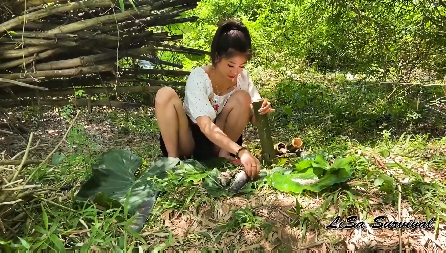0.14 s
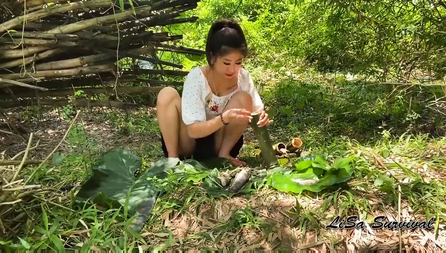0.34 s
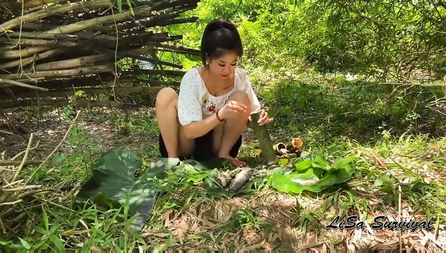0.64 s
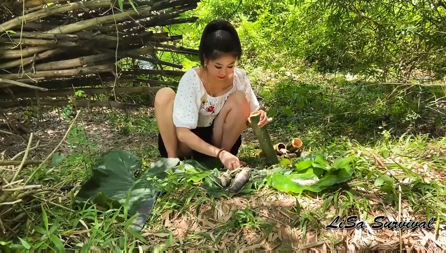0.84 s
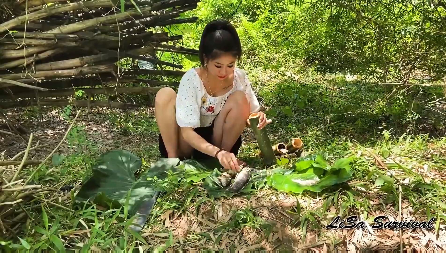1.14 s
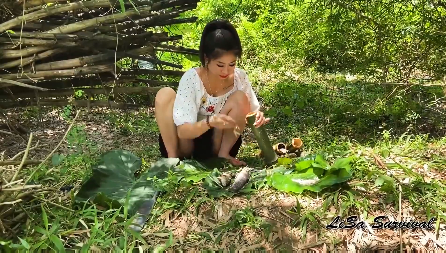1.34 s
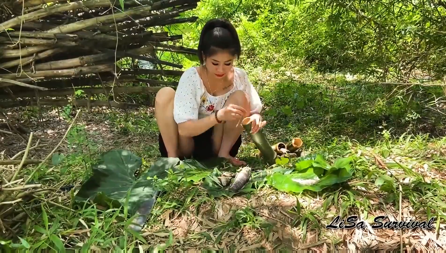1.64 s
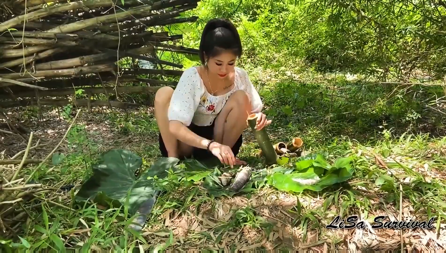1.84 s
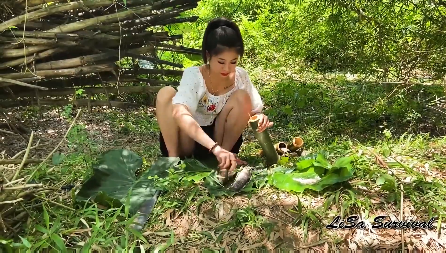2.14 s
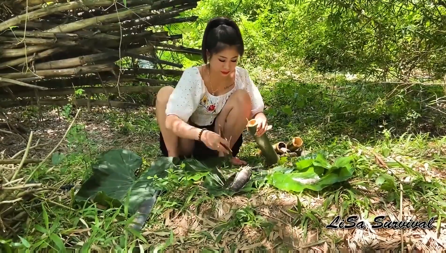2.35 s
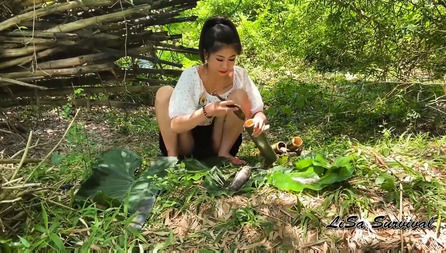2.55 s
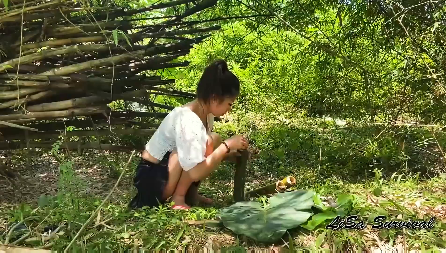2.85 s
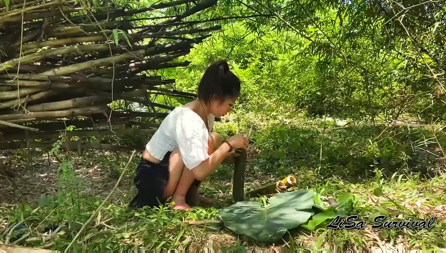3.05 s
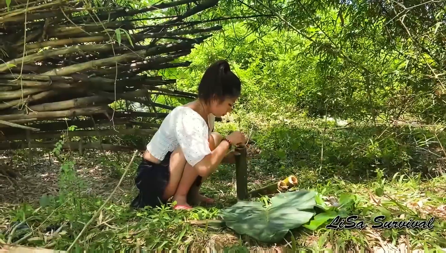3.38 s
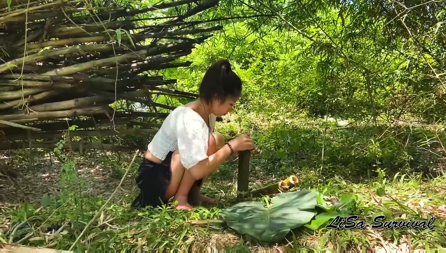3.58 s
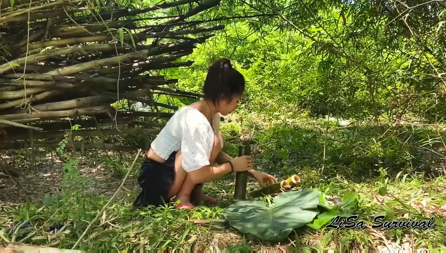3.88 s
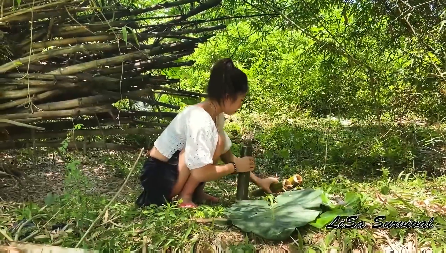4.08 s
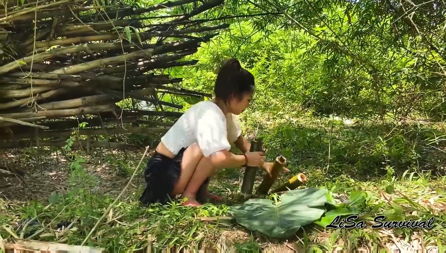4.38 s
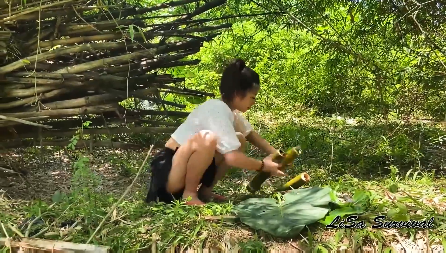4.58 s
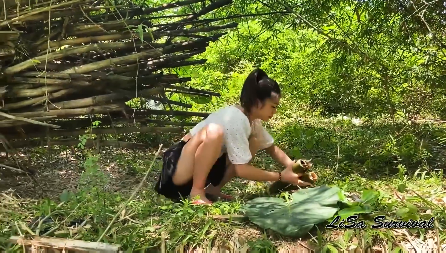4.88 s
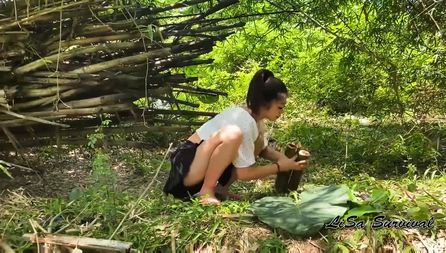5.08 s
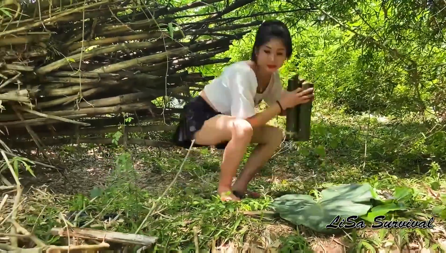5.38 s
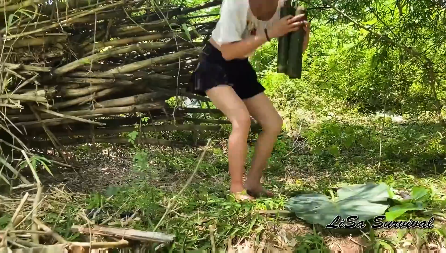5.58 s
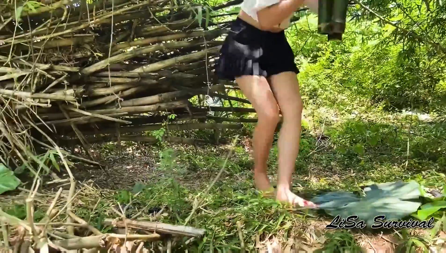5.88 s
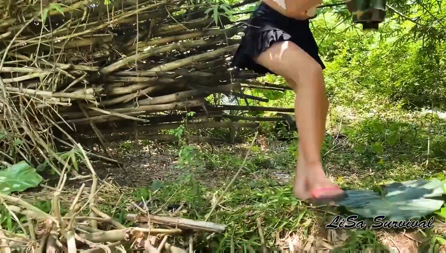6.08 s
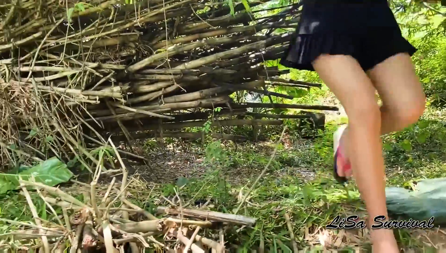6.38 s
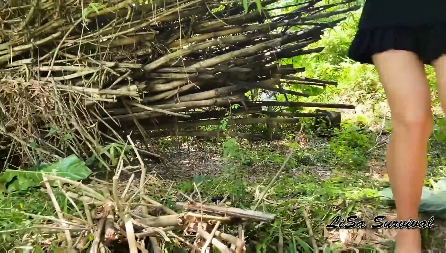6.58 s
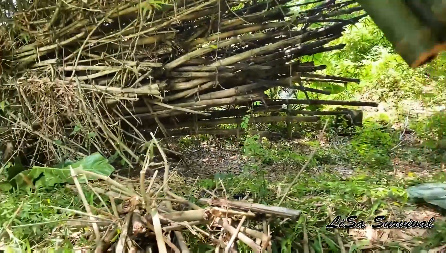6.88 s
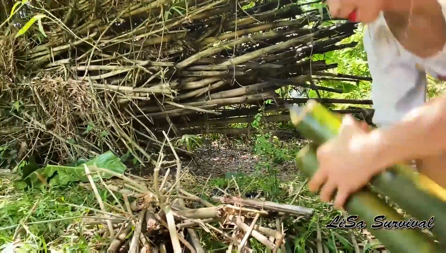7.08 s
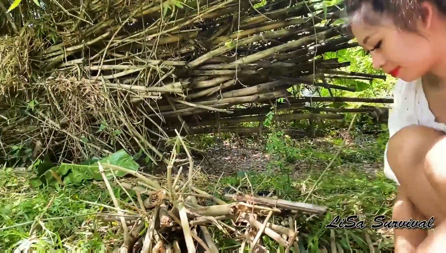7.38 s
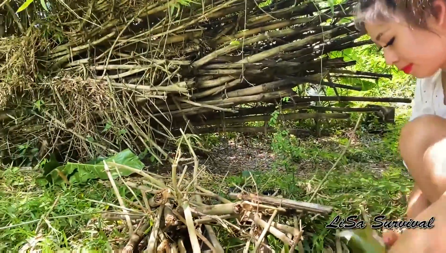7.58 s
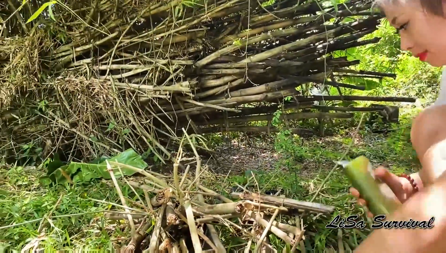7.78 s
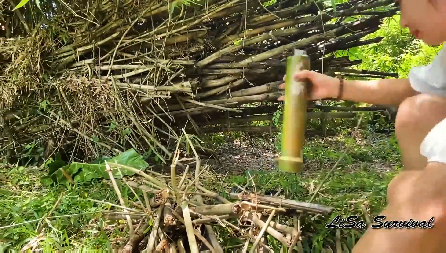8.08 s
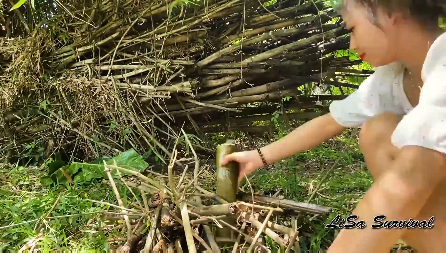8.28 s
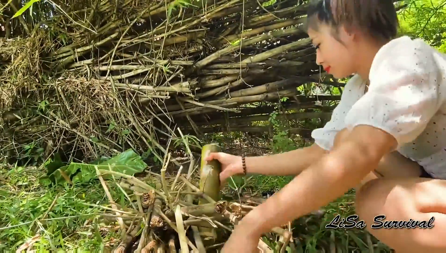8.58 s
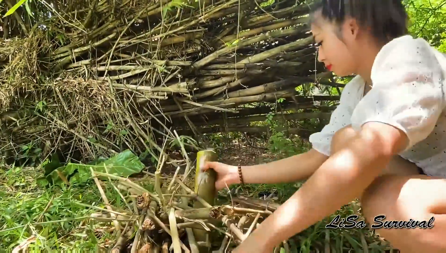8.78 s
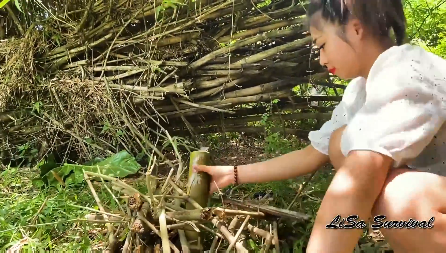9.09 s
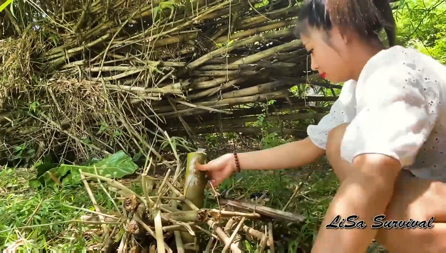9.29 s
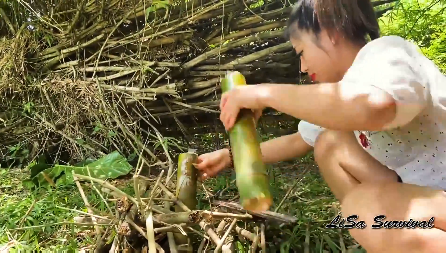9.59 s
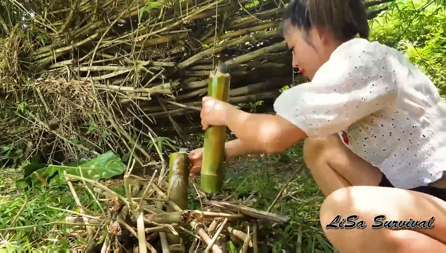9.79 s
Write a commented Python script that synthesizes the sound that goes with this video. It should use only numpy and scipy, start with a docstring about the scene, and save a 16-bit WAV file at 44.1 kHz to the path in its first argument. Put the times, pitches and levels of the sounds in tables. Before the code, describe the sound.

Outdoors, faint dry-leaf crackles over a far motor's hum; after a soft pop, birds chirp, hollow bamboo clacks and brittle sticks snap close by.

```python
"""Low air rumble and a far engine drone come first, with dry leaves rustling and twigs snapping close by.
Bamboo tubes then knock among sticks in a grove: decaying modes plus a noise crack for each blow.
Leaves are spiky noise and ringing splinters, snaps are noise bursts with a ping, bumps are damped sines.
Insects and air are shaped noise, the engine is wavering sines, two birds are gliding husky whistles.
The level dips almost to silence near 2.85 s and returns after a soft pop, with the air quieter."""
import sys
import numpy as np
from scipy import signal
from scipy.fft import rfft, irfft, next_fast_len
from scipy.io import wavfile
from scipy.ndimage import uniform_filter1d

SR = 44100
rng = np.random.default_rng(int(sys.argv[2]) if len(sys.argv) > 2 else 0)


def unload_audio(sound):
    """Save the sound as a 16-bit wav file, at the path given as the first command line argument."""
    columns = np.transpose(np.atleast_2d(sound))
    # keep every value between -1 and 1, then stretch to whole-number steps
    steps = np.round(np.clip(columns, -1, 1) * 32767)
    wavfile.write(sys.argv[1], SR, steps.astype(np.int16))


N = 438354
GAP_S = 2.87  # engine levels and stereo balance switch here


def amp(db):
    """Gain of a level in dB."""
    return np.exp(np.asarray(db) * np.log(10) / 20)


def unit(x):
    """x at rms 1."""
    return x / np.sqrt(np.mean(x ** 2) + 1e-20)


def along(points, hz):
    """Interpolate (Hz, value) points on a log frequency axis."""
    point_hz, value = np.transpose(points)
    return np.interp(np.log(hz + 1), np.log(point_hz + 1), value)


def curves(rows):
    """One value per sample for each column after the time."""
    s, *columns = np.transpose(rows)
    return [np.interp(np.arange(N) / SR, s, column) for column in columns]


def wobble(knots_per_s):
    """Random curve, linear between normal knots."""
    knots = rng.standard_normal(int(N * knots_per_s / SR) + 2)
    return np.interp(np.arange(N) * knots_per_s / SR, np.arange(len(knots)), knots)


def filtered(x, response):
    """x times a response of frequency, zero-padded."""
    size = next_fast_len(N + SR // 2)
    spectrum = rfft(x, size) * response(np.fft.rfftfreq(size, 1 / SR))
    return irfft(spectrum, size)[..., :N]


# Far sounds. Each row: frequency in Hz, left-right correlation [0..1].
FAR_LIKENESS = [(60, .82), (130, .72), (290, .72), (640, .72), (1410, .4), (2400, .6), (3800, .35),
                (6820, .3), (15000, .4)]


def rush(spectrum, grain=1, alike=FAR_LIKENESS):
    """Stereo noise of rms 1; mid and side shares set the correlation, a varying grain makes it spiky."""
    def mid_side_response(hz):
        turn_rad = np.arccos(np.clip(along(alike, hz), -1, 1)) / 2
        return amp(along(spectrum, hz)) * [np.cos(turn_rad), np.sin(turn_rad)]

    mid, side = filtered(grain * rng.standard_normal((2, N)), mid_side_response)
    return unit(np.array([mid + side, mid - side]))


def patchy(x, depth_db):
    """Random patches of gain over time and frequency keep the colour changing; rms 1."""
    bins = signal.stft(x, nperseg=256)[2]
    field = uniform_filter1d(rng.standard_normal(bins.shape[1:]), size=7, axis=0)
    field = uniform_filter1d(field, size=9, axis=1)
    return unit(signal.istft(bins * amp(depth_db * unit(field)), nperseg=256)[1][:, :N])


def add(track, s, sound, pan_db):
    """Lay a sound into a stereo track; positive pan favours the left."""
    start = round(s * SR)
    track[:, start:start + sound.shape[-1]] += amp([[pan_db / 2], [-pan_db / 2]]) * sound


def glides(rows, rough):
    """Short husky gliding tones with soft ends."""
    track = np.zeros((2, N + SR))
    for s, first_hz, last_hz, length_s, db in rows:
        u = np.linspace(0, 1, round(length_s * SR))
        flutter = unit(uniform_filter1d(rng.standard_normal(SR // 10), size=90))
        husk = 1 + rough * flutter[:len(u)]
        pitch_hz = last_hz + (first_hz - last_hz) * (1 - u) ** 2
        tone = np.sin(2 * np.pi * np.cumsum(pitch_hz) / SR)
        envelope = np.sqrt(np.abs(np.sin(np.pi * u)))
        add(track, s, amp(db) * husk * envelope * tone, 1.5)
    return track[:, :N]


def from_left(x):
    """A far source off to the left: the right port hears it later."""
    lead_samples = 11
    return np.array([x[0], np.roll(x[1], lead_samples)])


# Modes of three tubes. Each row: nominal frequency in Hz, level in dB, free t60 in s.
THIN = [(373, 3.5, 0.026), (840, 3.5, 0.019), (1247, 10, 0.0074), (1450, 0.5, 0.017), (1717, -0.5, 0.028),
        (2150, -1.5, 0.014), (2810, 2.5, 0.017), (3850, 0.5, 0.013), (4100, 1.5, 0.014),
        (4700, -0.5, 0.0087), (4900, -2, 0.009), (6120, -2, .009), (6750, 6, 0.0077), (7440, -6, 0.0063)]
GREEN = [(268, 4.5, 0.032), (550, 9.5, 0.018), (926, 5.5, 0.009), (1120, 1.5, 0.0091), (1990, 1.5, .014),
         (2150, -3, 0.017), (2640, 1.5, 0.018), (3570, 1, 0.0081), (4630, 0, .012), (6000, -9, 0.01),
         (7500, -6, 0.0072)]
WIDE = [(330, 7, 0.021), (454, 3, 0.026), (640, -11, 0.015), (1130, -3.5, 0.027), (1350, 1, 0.015),
        (1740, -1, 0.016), (2480, 4, 0.014), (3200, 1.5, 0.017), (4050, -3, 0.0079), (4890, 7.5, 0.013),
        (5920, -7, 0.008), (6950, -20, 0.0075), (7540, 3, 0.0088)]
# Tube being hit. Each row: from time in s, mode table.
STRUCK = [(0, THIN), (5.5, GREEN), (7.9, WIDE), (8.1, THIN)]
# Tube contacts. Each row: start in s, level in dB, centre of the blow in Hz, hollow thud in dB, wall in dB, #
# wall centre in Hz, edge in dB, left-right in dB, factor the grip applies to the free t60.
TUBE_KNOCKS = [(4.115, -68, 2020, 13, 13, 845, -5, 1, .9), (4.819, -31.5, 1590, -4, 6, 1380, -3.5, 0, 0.82),
               (4.8275, -25.5, 3220, -9.5, 2, 1360, -5.5, -2, 0.85),
               (4.8632, -46, 1560, -7, 0, 794, 1, 3, 0.77), (4.9275, -61, 1670, 0, -13, 727, 3, 0.0, .7),
               (4.9626, -54, 3240, -11, -19, 786, -2, 4, 0.94),
               (5.0272, -36, 1670, -11, -5, 1350, -2, 0, 0.82),
               (5.0387, -40, 2300, -2, -3, 875, -16, -0.5, .6),
               (5.046, -50, 2300, -9, -6, 1300, -9, 0, 0.65), (5.059, -51, 1900, -9, -6, 1300, -15, 0, .6),
               (5.069, -32.5, 1870, -14, -4, 1320, -13, 1, 1.16),
               (5.0752, -45, 2700, -22, -5, 1310, 1, -1, .6), (5.5585, -62, 1520, 1, 19, 1260, -3, 2, .9),
               (5.7232, -49, 1670, -1, 5, 856, -10, 1, 0.83), (6.634, -67, 2260, 6, 21, 900, -9, -3, 1.2),
               (7.018, -46, 2650, -15, -12, 1170, -15, 3, 1.2),
               (7.086, -38, 2300, -6, 12, 940, -20, -3, 0.87),
               (7.129, -42, 2500, -17, -3, 1190, -6, -5, 0.65),
               (7.132, -42, 3300, -20, -6, 1190, -3, -7, 0.68),
               (7.137, -38, 2300, -15, 9, 1190, -3, -11, 0.69),
               (7.4012, -23, 2630, -15.5, 4.5, 1070, -9, -3.5, 0.64),
               (7.6733, -60, 2700, 10, 15, 921, -1, 3, 0.89),
               (7.9824, -18.5, 2560, -11, 3.5, 1330, -6, -1, 0.86),
               (7.989, -32.5, 2560, 5.5, 6.5, 1100, -4, -0.5, 0.97),
               (8.1618, -39, 2150, -9, -10, 832, -19, -6, .9),
               (8.427, -39.5, 3650, -11, -23, 896, -26, -1, 1.4),
               (8.4564, -30.5, 3800, -26, -1.5, 1160, -7, 1, 0.68),
               (8.4935, -27.5, 1770, -38, -23, 1170, -2, 3, 1),
               (8.4993, -32, 1740, -21, -4, 1370, -11, -4, 1.05),
               (8.5164, -32.5, 3900, -25, -23, 1440, 2.5, 0, 0.86),
               (8.529, -44, 2700, -25, -8, 1300, 8, 1.0, 0.77),
               (8.717, -41, 2330, -19, 2, 1150, -4, 1.5, 0.85),
               (9.046, -48, 2390, -16, 1, 1210, -12, 2.0, .9),
               (9.6507, -66, 3740, 7, 12.5, 877, 8, 12, 1.04), (9.7934, -61, 1730, 6, -14, 716, -15, 1, .9)]


def tubes():
    """A blow rings middle modes nearest its centre most; hollow, wall and edge modes have own strengths."""
    track, t = np.zeros((2, N + SR)), np.arange(SR // 12) / SR
    rise = 1 - np.exp(-(t / 0.0013) ** 2)  # the contact lasts a moment
    port_db, port_rad = 1.1, .18  # spread of each mode between the two ports
    ports = np.reshape([1, -1], (2, 1, 1))
    for s, db, centre_hz, thud_db, wall_db, wall_hz, edge_db, pan_db, grip in TUBE_KNOCKS:
        modes = [table for since_s, table in STRUCK if since_s <= s][-1]
        hz, mode_db, t60_s = np.transpose(modes)[:, :, None]
        middle_db = -10.5 * np.abs(np.log2(hz / centre_hz))
        near_wall_db = wall_db - 14 * np.abs(np.log2(hz / wall_hz))
        share_db = np.select([hz < 600, hz < 1500, hz > 4450], [thud_db, near_wall_db, edge_db], middle_db)
        luck, phase, size, lean, turn = rng.standard_normal((5, *hz.shape))
        level_db = share_db + mode_db + 1.5 * luck + port_db * lean * ports
        angle = 2 * np.pi * hz * (1 + .015 * size) * t + 0.5 * phase + port_rad * turn * ports
        ring = amp(level_db - 60 * t / (grip * t60_s)) * np.sin(angle)
        noise = np.convolve(rng.standard_normal(len(t)), np.hanning(M=7) / 2, "same")
        crack = amp(edge_db - 0.5 - 60 * t / (grip * 0.031)) * noise
        add(track, s, amp(db) * rise * (ring.sum(axis=1) + crack), pan_db)
    return track[:, :N]


# Faint squeaks while the tubes are handled. Each row: start in s, first Hz, last Hz, length in s, level in dB.
HANDLING_SQUEAKS = [(6.733, 3450, 3400, .065, -56), (7.69, 1080, 1270, .09, -66),
                    (7.758, 5200, 4870, .008, -51), (7.75, 1850, 1820, .036, -68),
                    (7.75, 2500, 2450, .04, -70), (7.893, 3800, 3870, .065, -67),
                    (7.9, 3350, 3400, .06, -72), (7.905, 1450, 1430, .048, -67),
                    (8.028, 3900, 4220, .05, -56), (8.66, 5900, 5200, .015, -59)]


def squeaks():
    """Slightly rough gliding tones."""
    return glides(HANDLING_SQUEAKS, rough=.35)


# Twig and leaf snaps. Each row: start in s, level in dB, centre in Hz, left-right in dB, t60 in s.
TWIG_SNAPS = [(.178, -52, 5000, 0, 0.0091), (.213, -52, 7000, 0, .015), (.451, -59, 4590, -11, .015),
              (.9996, -47, 8500, -11, 0.013), (1.0744, -51, 4080, 3, 0.016), (1.205, -48, 5620, 2, .015),
              (1.2615, -47, 4470, -2, .015), (1.315, -39, 3630, 1, 0.023), (1.9, -46.5, 4830, 2, 0.017),
              (1.9444, -54, 4550, 1, .015), (2.135, -44, 13000, 0, .012), (2.177, -47.5, 6000, -10, .015),
              (2.2677, -48, 5500, 11, .015), (2.354, -55, 12500, 3, .012), (2.359, -42.5, 6200, 18, 0.012),
              (2.716, -46, 5850, 4, .015), (3.179, -49, 5630, .5, .015), (3.746, -54, 12500, .5, .008),
              (3.9848, -41, 6000, .5, 0.016), (4.4994, -48, 7140, .5, .015), (5.969, -37, 4200, -2, 0.022),
              (6.3544, -32.5, 3800, 4, 0.02), (6.732, -41, 5900, 15, .015), (6.74, -51, 5900, 3, .015),
              (6.753, -35, 2600, 0, .012), (6.869, -45, 6600, 13, .01), (6.871, -50, 2190, 0, .015),
              (7.008, -28, 7100, 13, 0.011), (7.138, -36, 8000, 12, 0.015), (7.575, -37, 8100, 0, 0.017),
              (7.64, -44, 4850, 0, .012), (7.65, -37, 4940, 0, 0.015), (7.76, -33.5, 7130, 6, 0.017),
              (8.013, -40, 2500, -2, .02), (8.06, -40, 9000, 0, .009), (8.096, -41, 2770, -3, 0.016),
              (8.335, -40, 5130, 0, 0.017), (8.369, -23.5, 5000, -3, 0.013), (8.371, -26, 11000, -2, 0.01),
              (8.3886, -21.5, 9950, 8.5, 0.01), (8.4022, -24, 6650, -0.5, 0.018),
              (8.47, -32, 4500, 6, .015), (8.5135, -24, 6600, 2, .015), (8.5774, -44, 6440, 3, .015),
              (8.62, -37, 2900, 0, .015), (8.704, -38, 6600, 0, .015), (8.8104, -34, 6900, 9, 0.014),
              (8.859, -34, 11500, 2, .007), (8.894, -36, 7100, 3, .012), (8.937, -29, 6570, 6, 0.015),
              (9.102, -26.5, 5900, -6, 0.0095), (9.109, -22.5, 9000, 9.5, .006),
              (9.1313, -24.5, 8900, 0, 0.007), (9.599, -56, 4600, -2, .015)]


def snaps():
    """A short burst of noise and a ping at the size of the broken piece."""
    track, t = np.zeros((2, N + SR)), np.arange(SR // 30) / SR
    for s, db, centre_hz, pan_db, t60_s in TWIG_SNAPS:
        edges_hz = [0.72 * centre_hz, min(1.45 * centre_hz, 20000)]
        band = signal.butter(N=1, Wn=edges_hz, btype="band", fs=SR, output="sos")
        burst = unit(signal.sosfilt(band, rng.standard_normal(len(t))))
        ping = .9 * np.sin(2 * np.pi * centre_hz * t)
        envelope = amp(db - 10.5 - 60 * t / t60_s) * (1 - np.exp(-t / 0.00062))
        add(track, s, envelope * (burst + ping), pan_db)
    return track[:, :N]


# Leaves never lie quite still. Each row: time in s, crunch in dB, swish in dB.
LEAF_STIR = [(0, -81, -90), (2.87, -77.5, -70.5), (3.5, -84.5, -74), (5.8, -83, -75), (7, -79, -66),
             (9.2, -71.5, -65), (9.94, -86.5, -74)]
# Dry leaves crushed or dragged. Each row: time at full strength in s, hold in s, crunch in dB, swish in dB.
LEAF_CONTACTS = [(.21, .01, -68.5, -85), (.448, 0.014, -64.5, -69), (.84, 0.009, -78, -79),
                 (1.0, 0.089, -77, -77), (1.2, 0.088, -69, -69), (1.49, 0.012, -80, -69),
                 (1.93, 0.04, -64.5, -61), (2.13, 0.28, -72.5, -76), (2.55, .16, -85, -90),
                 (3.612, 0.028, -89, -66), (3.98, 0.029, -71.5, -64), (4.095, 0.0076, -67.5, -67),
                 (4.51, 0.055, -74, -66), (4.819, 0.12, -71, -64.5), (5.033, 0.06, -69, -79),
                 (5.207, 0.074, -64.5, -61.5), (5.42, 0.0085, -69.5, -72), (5.559, .01, -72, -82),
                 (5.75, 0.011, -69.5, -71), (5.962, 0.028, -58.5, -52.5), (6.058, 0.004, -66.5, -56),
                 (6.354, 0.017, -56.5, -49.5), (6.48, 0.011, -68, -58.5), (6.728, 0.012, -54, -51),
                 (6.752, 0.006, -52, -44), (6.84, 0.046, -65, -55.5), (7.008, 0.0071, -54, -48),
                 (7.088, 0.0085, -57, -48.5), (7.108, .015, -64, -63), (7.13, 0.0031, -54, -47),
                 (7.397, 0.004, -57, -51), (7.584, 0.014, -60, -53.5), (7.64, .12, -68, -59.5),
                 (7.968, .002, -55, -49), (8.0, 0.25, -55, -50), (8.366, 0.12, -52.5, -48.5),
                 (8.491, 0.02, -43, -52), (8.525, 0.0057, -58, -59), (8.58, .36, -61, -57.5),
                 (8.6, 0.014, -53.5, -49), (8.704, 0.063, -55.5, -65), (8.807, 0.005, -56, -56),
                 (8.925, 0.015, -53.5, -60), (9.019, 0.075, -58.5, -59.5), (9.099, 0.0032, -52.5, -51),
                 (9.285, 0.023, -64.5, -60), (9.417, 0.03, -65, -56.5), (9.668, 0.0083, -78, -73),
                 (9.798, 0.0081, -73, -77)]


def handling():
    """Gains of crunch and swish: each contact swells fast, holds and dies away over a faint stir."""
    rise_db_per_s, fall_db_per_s = 619, 329.5
    t, power = np.arange(N) / SR, amp(curves(LEAF_STIR)) ** 2
    for s, held_s, *levels_db in LEAF_CONTACTS:
        near = slice(round((s - .15) * SR), round((s + held_s + .25) * SR))
        rise_loss_db = rise_db_per_s * np.clip(s - t[near], 0, None)
        fall_loss_db = fall_db_per_s * np.clip(t[near] - s - held_s, 0, None)
        power[:, near] += amp(np.array(levels_db)[:, None] - (rise_loss_db + fall_loss_db)) ** 2
    return np.sqrt(power)


def crackle():
    """Tiny ringing splinters of scattered pitch, size and side; rms 1."""
    rate_per_s, usual_hz, life_cycles = 900, 3800, 6  # a splinter falls 26 dB per life, then fades out
    start, side = rng.random((2, int(rate_per_s * N / SR), 1))
    k = np.arange(300)
    hz = np.clip(usual_hz * np.exp(.45 * rng.standard_normal(start.shape)), 1200, 14000)
    cycles = hz * k / SR
    envelope = amp(4.5 * rng.standard_normal(start.shape) - 26 * cycles / life_cycles)
    envelope = envelope * np.tanh(cycles) * (1 - k / len(k))
    grain = envelope * np.sin(2 * np.pi * cycles)
    where = ((start * N).astype(int) + k).ravel()
    turn_rad = np.pi / 4 + .9 * (side - .5)
    gains = np.cos(turn_rad), np.sin(turn_rad)
    return unit(np.array([np.bincount(where, (g * grain).ravel(), N + len(k))[:N] for g in gains]))


# Leaf spectra. Each row: frequency in Hz, density in dB per Hz.
CRUNCH_SPECTRUM = [(500, -9), (1000, -1.5), (2000, -4), (4000, -2), (7000, -4), (12000, -21.5),
                   (16000, -24)]
SWISH_SPECTRUM = [(3000, -13), (6000, -2), (10000, -0.5), (13000, -1.5), (16000, 1)]
# Close leaves. Each row: frequency in Hz, left-right correlation [0..1].
LEAF_LIKENESS = [(550, .9), (1650, .5), (5000, .42), (15000, .5)]
# Where the leaves rustle. Each row: time in s, left-right in dB.
LEAF_PLACE = [(0, 6), (2.3, 2), (2.9, 1), (6.2, 0.5), (6.8, 3), (7.9, 1), (8.2, 2.5), (8.5, 1), (9.94, 1.5)]


def leaves():
    """Clumps of tiny breaks: noise whose gain jumps from millisecond to millisecond."""
    crunch_gain, swish_gain = handling()
    clumps_db = 1.1 * wobble(80)
    crunch = rush(CRUNCH_SPECTRUM, amp(clumps_db + 1.0 * wobble(600)), LEAF_LIKENESS)
    swish = rush(SWISH_SPECTRUM, amp(clumps_db + 2.4 * wobble(900)), LEAF_LIKENESS)
    crunch = patchy(crunch, depth_db=3.0) + amp(-4) * crackle()
    swish = patchy(swish, depth_db=1.4)
    pan = amp(curves(LEAF_PLACE)[0] * [[.5], [-.5]])
    return pan * (crunch_gain * crunch + swish_gain * swish)


# Soft low bumps. Each row: start in s, level in dB, frequency in Hz.
GROUND_THUMPS = [(0.327, -36, 165), (0.347, -33, 260), (0.635, -50, 121), (0.698, -37, 155),
                 (3.377, -63, 121), (3.629, -45, 171), (5.729, -37, 148), (5.872, -35.5, 123),
                 (7.969, -40, 308), (9.465, -39.5, 171), (9.653, -45, 190)]


def thumps():
    """Heel, hand or tube end on soft ground: a heavily damped sine."""
    track, t = np.zeros((2, N + SR)), np.arange(SR // 20) / SR
    for s, db, hz in GROUND_THUMPS:
        add(track, s, amp(db + 4.5 - 60 * t / 0.032) * np.sin(2 * np.pi * hz * t), 0)
    return track[:, :N]


# One falling chirp. Each row: time in s, nominal pitch in Hz, level in dB.
CHIRP_NOTE = [(.0042, 12320, -10.5), (.006, 10600, -6), (.008, 8310, -0.5), (0.0103, 6990, 1.5),
              (.014, 6140, 1.5), (.02, 5450, -2), (.032, 4720, -7), (.042, 4490, -13), (0.055, 4250, -17)]
# Its repeats. Each row: time origin in s, level in dB, extra on the high start in dB.
BIRD_CHIRPS = [(2.935, -55.5, 6), (3.086, -54, 2), (3.222, -53, 2), (3.357, -53, -6), (3.496, -54.5, -4),
               (3.629, -54, -7), (3.768, -54, 8), (3.902, -53, 8), (4.036, -53.5, 5), (4.167, -54, 9),
               (4.302, -52.5, 6), (4.44, -53, 3.5), (4.577, -53, 5), (4.713, -54, 6), (4.85, -52, 4),
               (4.98, -52, 4), (5.115, -54, 6.5), (5.249, -52, 4), (5.383, -51, 2), (5.518, -52.5, 4),
               (5.65, -54, 4), (5.781, -53.5, 8), (5.919, -54.5, 4), (6.052, -54, 4), (6.188, -54.5, 5.5),
               (6.322, -52, 2), (6.455, -52.5, 3), (6.586, -55, 0), (6.724, -58, 3), (6.861, -55, -1),
               (6.997, -51, 3), (7.137, -58, -1), (7.277, -55, 0), (7.412, -56, -1), (7.547, -54.5, 6),
               (7.683, -57, 1), (7.819, -53.5, 4), (9.281, -58, -2), (9.424, -55.5, -4), (9.562, -56.5, 3),
               (9.698, -55, -1), (9.835, -58, -1)]


def bird():
    """One husky falling whistle, its pitch, tilt and roughness varied a little each time."""
    track, (when_s, note_hz, note_db) = np.zeros((2, N + SR)), np.transpose(CHIRP_NOTE)
    t = np.arange(when_s[0], when_s[-1], 1 / SR)
    pitch_hz = np.interp(t, when_s, note_hz)
    for s, level_db, top_db in BIRD_CHIRPS:
        low_end_db = -1 + 3 * rng.standard_normal()
        tilt_db = np.interp(pitch_hz, [4800, 7400, 10000], [low_end_db, 0, top_db])
        husk = 1 + 0.3 * unit(uniform_filter1d(rng.standard_normal(len(t)), size=30))
        phase = 2 * np.pi * np.cumsum(pitch_hz) / SR * (1 + 0.0078 * rng.standard_normal())
        gain = amp(level_db + tilt_db + np.interp(t, when_s, note_db))
        add(track, s + when_s[0], gain * husk * np.sin(phase), 1.5)
    return track[:, :N]


# A second bird. Each row: start in s, first Hz, last Hz, length in s, level before the mix in dB.
BIRD_PEEPS = [(2.972, 10200, 7000, 0.011, -50), (3.155, 6660, 5200, 0.013, -62),
              (3.351, 7300, 5300, .017, -62), (3.554, 6600, 5100, 0.0104, -62),
              (3.757, 7100, 5200, .017, -68), (4.123, 6500, 10900, 0.0127, -67),
              (4.145, 7600, 5250, 0.018, -64), (4.184, 5400, 9300, 0.0059, -48),
              (4.19, 9660, 8240, 0.0086, -53), (4.321, 7600, 9140, 0.0096, -52),
              (4.329, 9300, 6740, 0.0073, -54), (5.872, 10400, 7200, 0.0097, -51)]


def peeps():
    """Short rough whistles gliding up or down."""
    return glides(BIRD_PEEPS, rough=.6)


# Insects. Each row: time in s, lower singer in dB, upper singer in dB.
INSECT_LEVELS = [(0, -83, -92), (.08, -86, -91), (.3, -83, -80), (.42, -88, -91), (.5, -78, -89),
                 (.9, -83, -87), (.97, -93, -92), (1.1, -76, -93), (1.75, -78.5, -85), (1.9, -76, -78),
                 (2.3, -82, -93), (2.8, -90, -90), (3.0, -76, -80), (3.5, -73, -81), (4.15, -79, -72),
                 (4.45, -82, -79), (5.0, -75, -76), (5.6, -72, -80), (6.5, -76, -77), (7.3, -95, -94),
                 (8.15, -77, -74), (8.9, -78, -80), (9.6, -85, -85), (9.94, -72.5, -78)]


def insects():
    """Three narrow bands of noise; the lower two shimmer."""
    low_db, upper_db = curves(INSECT_LEVELS)
    low_band = [(7700, -30), (8200, -5), (8600, 0), (9100, -2), (9800, -22)]
    upper_band = [(8400, -22), (9100, -3), (9550, 0), (9950, -5), (10800, -28)]
    low = patchy(rush(low_band, amp(2.4 * wobble(40))), depth_db=3)
    upper = patchy(rush(upper_band, amp(2.4 * wobble(40))), depth_db=3)
    high = rush([(12800, -41), (13400, 2), (13800, 2.5), (14400, -45)])
    late = np.clip((np.arange(N) / SR - 8.8) / 0.44, 0, 1)  # the highest singer joins near the end
    pair = amp(low_db + 1.5 * wobble(3.5)) * low + amp(upper_db + 0.98 * wobble(4.3)) * upper
    return pair + amp(-80.5) * late * high


# Engine tones. Each row: frequency in Hz, level before GAP_S in dB, level after in dB.
ENGINE_TONES = [(83, -45.5, -59), (166.5, -54, -53.5), (207.8, -64, -64), (250.1, -50, -57),
                (297, -73, -65), (348.5, -58.5, -65), (410, -65.5, -71.5), (421, -66, -76),
                (459.5, -61.5, -70), (557.5, -64.5, -72), (666.5, -65, -79)]


def engine():
    """Tones that waver in level and phase on their long way, a little differently at each port."""
    t = np.arange(N) / SR
    apart_rad = 0.23 * wobble(2.0) * [[1], [-1]]
    drone = np.zeros((2, N))
    for hz, early_db, late_db in ENGINE_TONES:
        level_db = np.where(t < GAP_S, early_db, late_db) + 1.02 * wobble(5.4)
        drone += amp(level_db) * np.sin(2 * np.pi * hz * t + 0.25 * wobble(3.7) + apart_rad)
    return drone


# Air levels. Each row: time in s, rumble in dB, far roar in dB.
AIR_LEVELS = [(0, -48, -53.5), (.5, -43, -53), (.6, -47.5, -54), (.75, -48, -53.5), (1.3, -44.5, -51),
              (1.7, -44.5, -52.5), (2.25, -41.5, -51), (2.6, -46, -55.5), (2.88, -43, -53),
              (2.9, -51.5, -60), (3.15, -61.5, -61.5), (3.5, -55, -59), (4.3, -46, -59), (5.3, -53, -58),
              (6.1, -49.5, -58.5), (7.2, -53.5, -57), (8.4, -53, -56.5), (9.1, -51, -58.5),
              (9.94, -53.5, -58)]
# Brief swells of the rumble. Each row: time in s, added level in dB.
RUMBLE_SWELLS = [(.035, 14.5), (.09, 11.5), (.152, 14.5), (.212, 9.5), (.275, 8.5), (0.338, 11), (.43, 4),
                 (.54, 10), (1.05, 5), (1.14, 8.5), (1.3, 11), (1.41, 1), (2.25, 7.5), (3.38, 14.5),
                 (3.79, 9), (3.98, 6.5), (4.65, -2), (4.73, 5), (5.733, 13.5), (6.17, 4.5), (8.97, 2),
                 (9.11, 8), (9.33, 4), (9.47, 9), (9.77, 8.5), (9.94, 18.5)]
# Spectra of rumble, far roar and distant foliage. Each row: frequency in Hz, density in dB per Hz.
RUMBLE_SPECTRUM = [(12, -65), (20, -52), (69, -9), (113, 0.5), (172, -5), (220, -13.5), (254, -16.5),
                   (280, -19.5), (360, -25), (620, -120)]
ROAR_SPECTRUM = [(180, -14.5), (240, -3.5), (350, -9.5), (500, -13), (700, -16.5), (880, -21.5),
                 (1050, -30.5), (1600, -35.5), (2500, -87)]
FOLIAGE_SPECTRUM = [(700, -14), (1200, -7), (2400, 4.5), (3000, -5), (5000, -15.5), (10000, -15),
                    (16000, -24)]
# Foliage hiss. Each row: time in s, level in dB.
FOLIAGE_LEVELS = [(0, -70), (2.87, -68.5), (2.88, -91), (9.94, -92)]


def air():
    """Lumpy low rumble, a smoother far roar and a faint foliage hiss, all shaped noise."""
    t, (rumble_db, roar_db) = np.arange(N) / SR, curves(AIR_LEVELS)
    coarse_t, swell_half_width_s = t[::64], 0.023
    bumps_db = sum(db * np.exp(-((coarse_t - s) / swell_half_width_s) ** 2) for s, db in RUMBLE_SWELLS)
    swell_db = np.interp(t, coarse_t, bumps_db)
    lumps = amp(2 * wobble(10))
    rumble = amp(rumble_db + swell_db) * unit(lumps * rush(RUMBLE_SPECTRUM))
    roar = amp(roar_db + 0.73 * wobble(11)) * rush(ROAR_SPECTRUM)
    hiss_gain = amp(curves(FOLIAGE_LEVELS)[0] + 0.23 * wobble(30))
    return from_left(rumble + roar) + hiss_gain * patchy(rush(FOLIAGE_SPECTRUM), depth_db=2.0)


# Echo decay. Each row: frequency in Hz, t60 in s.
GROVE_DECAY = [(200, 0.092), (2000, 0.11), (10000, 0.15)]


def grove(x):
    """Scattered echoes off stems; each third of a second gets a new random tail."""
    out, step = np.zeros((2, N + SR)), SR // 3
    for start in range(0, N, step):
        hz, t, bins = signal.stft(rng.standard_normal((2, SR // 5)), SR, nperseg=128)
        decay = amp(-60 * t / along(GROVE_DECAY, hz)[:, None])
        tail = signal.istft(bins * decay, SR, nperseg=128)[1]
        wet = signal.fftconvolve(x[:, start:start + step], tail / np.linalg.norm(tail[0]), axes=1)
        out[:, start:start + wet.shape[1]] += wet
    return out[:, :N]


def scene():
    """Near hits are nearly dry, the peeps partly echoes, the chirps mostly echoes."""
    peep = peeps()
    near = tubes() + snaps() + thumps() + squeaks() + .6 * peep
    far = bird() + .5 * peep
    echoes = grove(amp(-15.5) * near + amp(-1.0) * far)
    sound = near + .32 * far + echoes + leaves() + insects() + from_left(engine()) + air()
    # before GAP_S the right port lags and the left is weaker
    gap, lag_samples, left_db = round(GAP_S * SR), 9, -1.3
    sound[1, lag_samples:gap] = sound[1, :gap - lag_samples].copy()
    sound[0, :gap] *= amp(left_db)
    return sound


# Overall level. Each row: time in s, gain in dB.
LEVEL_FADE = [(0, 1.5), (2.68, 0), (2.78, -8.5), (2.845, -16.5), (2.851, -40), (2.8912, -34),
              (2.8915, -0.5), (9.94, 1.5)]
# Soft pop. One row: peak time in s, peak before the filter in dB, half width of the rise in s.
SOFT_POP = (2.8765, -40, 0.0011)


def record(dry):
    """The microphone's bass roll-off, a brief fade with one soft pop in it, then the band limit."""
    pop_s, pop_db, width_s = SOFT_POP
    u = (np.arange(N) / SR - pop_s) / width_s
    pop = amp(pop_db) * np.exp(-np.where(u < 0, u, 4.4 * u) ** 2)  # falls faster than it rises
    bass_cut = signal.butter(N=2, Wn=46, btype="high", fs=SR, output="sos")
    faded = signal.sosfilt(bass_cut, dry) * amp(curves(LEVEL_FADE)[0])
    top_hz = 15850
    return filtered(faded + pop, lambda hz: hz < top_hz)


dry = scene()
out = record(dry)
unload_audio(out)
```